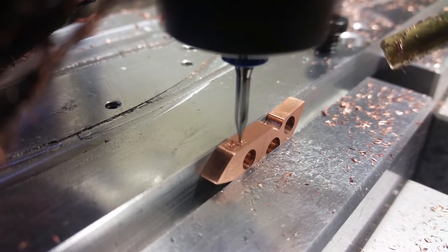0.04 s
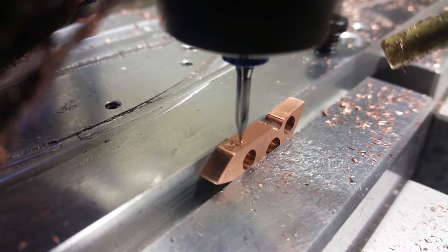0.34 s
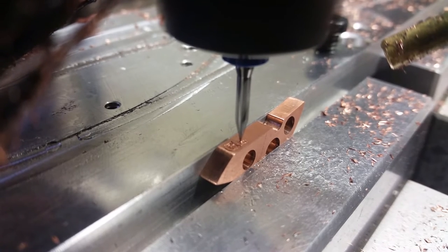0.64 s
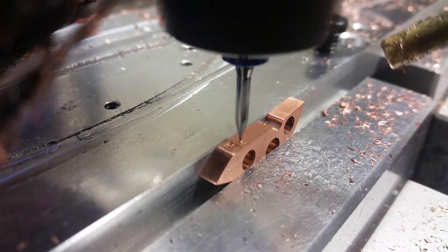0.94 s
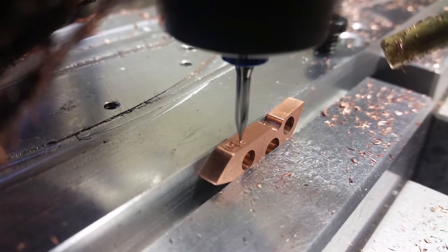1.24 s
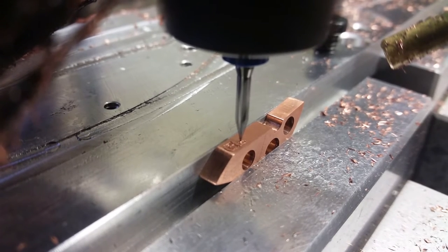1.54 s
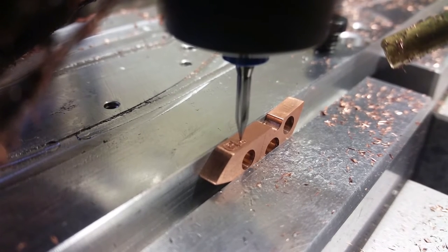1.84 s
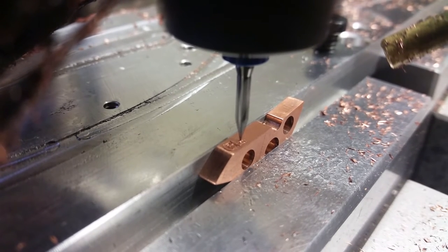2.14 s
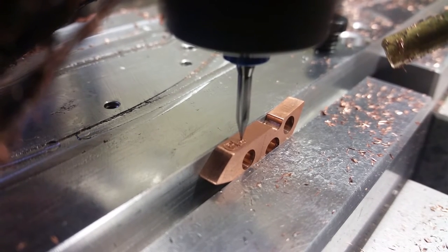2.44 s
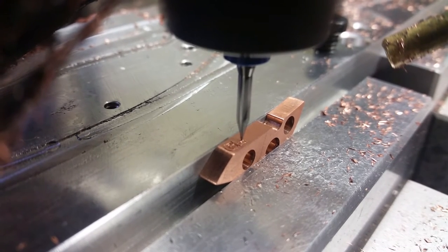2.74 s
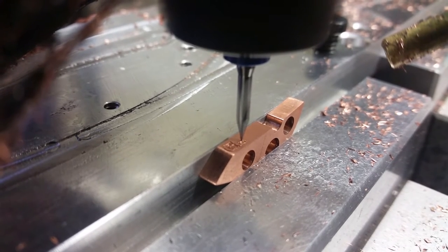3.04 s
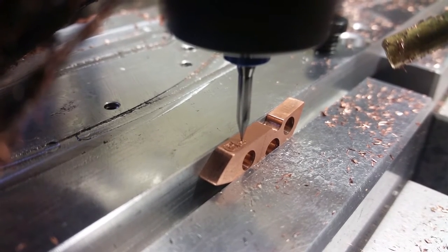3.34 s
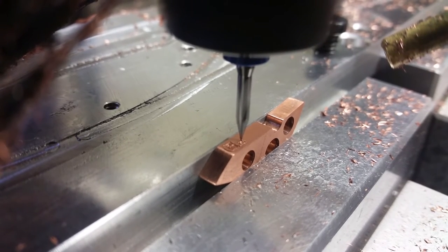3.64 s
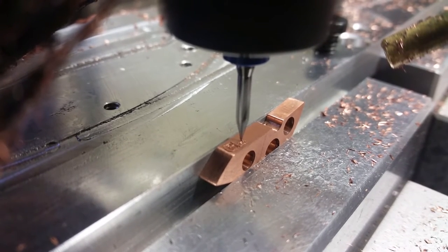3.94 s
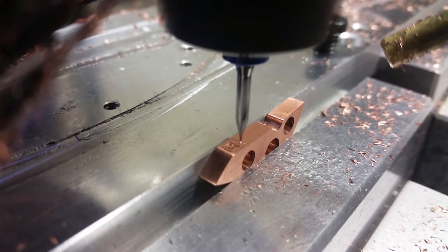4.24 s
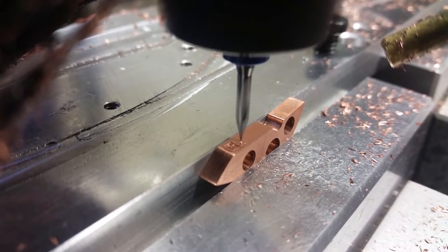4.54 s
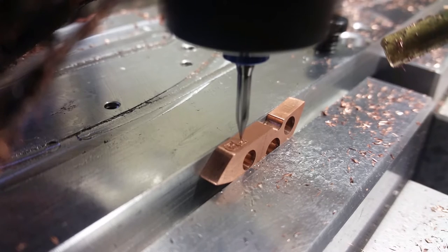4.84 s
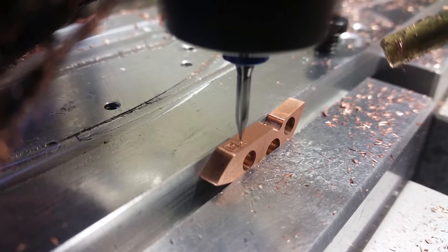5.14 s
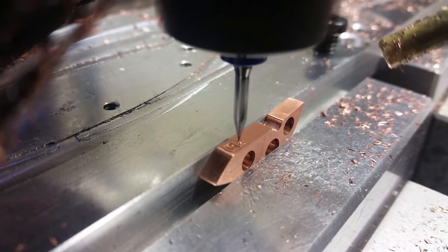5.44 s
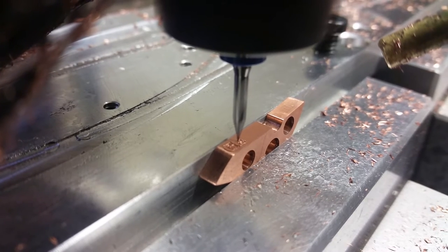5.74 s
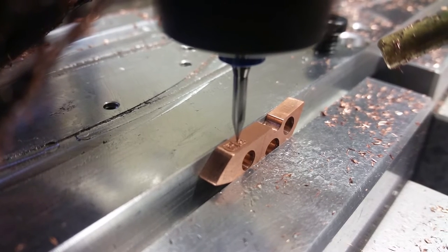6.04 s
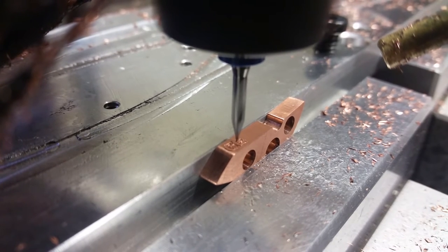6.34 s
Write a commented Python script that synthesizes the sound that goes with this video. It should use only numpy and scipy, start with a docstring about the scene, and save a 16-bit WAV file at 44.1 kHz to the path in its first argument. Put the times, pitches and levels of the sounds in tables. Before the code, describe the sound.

From the very start, a milling machine is running on a small copper part, heard close to the cutter. The spindle gives a steady low hum with a thin whine above it, a coolant pump drones underneath, and the enclosure rings faintly with the machine noise. Over this lies the bright, constant hiss of a nozzle, spread across both sides. All the way through, stray air washes over the left side of the microphone, making a fluttering rush with a steady tone and irregular pops, several a second, each trailing a short scuff. Around 5.7 seconds the air blows a little harder. Just after, at about 5.8 seconds, there is a stronger pop, the hum swells slightly under load and the whine dips briefly. The hum, hiss and puffs are still going at the end, at about 6.5 seconds.

```python
"""A CNC mill engraves a small copper part, heard from a phone close to the cutter.
From the start, spindle and coolant pump hum in a ringing enclosure, under a nozzle's bright hiss.
All the way through, stray air washes over the left microphone port, fluttering and popping in puffs.
Near 5.7 s the air blows a little harder; just after, the hum swells under load and the spindle's
thin whine dips briefly. The machine is still running at the end."""
import sys
import numpy as np
from scipy import signal
from scipy.fft import rfft, irfft
from scipy.io import wavfile

SR = 44100
rng = np.random.default_rng(int(sys.argv[2]) if len(sys.argv) > 2 else 0)


def generate_wav(sig):
    """Save sig (samples, or channels by samples) to the path in sys.argv[1] as 16-bit PCM at SR."""
    pcm = np.round(np.clip(np.atleast_2d(sig).T, -1, 1) * 32767).astype(np.int16)
    wavfile.write(sys.argv[1], SR, pcm)


N = 285768
T = np.arange(N) / SR
FREQS = np.arange(N // 2 + 1) * SR / N

# Strong puffs hitting the left port. Each row: start in seconds, relative level of the pop in dB,
# relative level of its wake in dB.
STRONG_PUFFS = [(0.058, -20.5, -31), (0.175, -20, -28), (0.369, -23, -29), (0.73, -18.5, -26),
                (0.869, -22, -32), (0.983, -16, -28), (1.02, -17.5, -27), (1.301, -21.5, -32),
                (1.477, -16.5, -28), (1.638, -17, -29), (1.937, -21.5, -31), (2.299, -25, -32),
                (2.509, -21, -29.5), (2.929, -22, -31), (2.98, -19.5, -30), (3.194, -25, -30),
                (3.769, -21, -30), (4.001, -22, -34), (4.549, -21.5, -32), (4.847, -18.5, -30),
                (5.02, -20, -28), (5.153, -24, -32), (5.329, -24, -31), (5.412, -21.5, -34),
                (5.781, -15, -27), (5.987, -22, -32), (6.005, -21, -30), (6.159, -23.5, -32),
                (6.429, -19, -31)]
PUFF_RISE_S = .0042  # from a puff's start to its peak
GUST_MIDDLE_S, GUST_HALF_S = 5.7, 0.71  # the stray air blows harder around here


def amp(db):
    """Decibels to gain."""
    return 10 ** (np.asarray(db) / 20)


def swell(middle_s, half_s):
    """A smooth rise to 1 and fall back to 0."""
    return np.exp(-((T - middle_s) / half_s) ** 2)


def drift(rate_hz):
    """Smooth random motion of unit spread, changing about rate_hz times a second."""
    motion = irfft(rfft(rng.standard_normal(N)) / (1 + (FREQS / rate_hz) ** 4), N)
    return motion / motion.std()


def colour(noise, points, lift_db=0):
    """Give unit white noise a spectrum of (Hz, dB per Hz) points."""
    hz, db = np.transpose(points)
    db = np.interp(np.log(FREQS + 1), np.log(hz), db) + lift_db
    return irfft(rfft(noise) * amp(db) * np.sqrt(SR / 2), N)


def delay(x, lag_s):
    """The same sound a little later."""
    return irfft(rfft(x) * np.exp(-2j * np.pi * FREQS * lag_s), N)


def cycle_angle(hz, wander):
    """Angle of something that turns or pulses at a nearly even rate."""
    return 2 * np.pi * np.cumsum(hz * (1 + wander * drift(3.6))) / SR


def partials(angle, rows, waver_db, left_lead_rad=0.47):
    """Stereo tones from (multiple of the angle, left dB, right dB) rows; each wavers on its own."""
    tones = np.zeros((2, N))
    for multiple, left_db, right_db in rows:
        phase = multiple * angle + rng.uniform(0, 2 * np.pi)
        pair = np.array([amp(left_db) * np.sin(phase), amp(right_db) * np.sin(phase - left_lead_rad)])
        tones += np.sqrt(2) * pair * amp(waver_db * drift(2.8))
    return tones


def enclosure():
    """A bed of machine noise ringing in the panels; its bass is alike at both ports."""
    # Tone of the enclosure and workshop. Each row: frequency in Hz, level in dB per Hz.
    room_tone = [(25, -83), (55, -83), (90, -77), (200, -74), (280, -68), (430, -83), (500, -80.5),
                 (700, -79.5), (1500, -78.5), (2100, -75.5), (3600, -76.5), (5000, -82), (15000, -93)]
    # Panel resonances. Each row: centre in Hz, width in Hz, lift in dB.
    panels = [(574, 45, 15), (1170, 70, -1), (1263, 28, 10.5), (1890, 70, 4.5), (2600, 110, 3.5)]
    ring_db = sum(db / (1 + (2 * (FREQS - hz) / width) ** 2) for hz, width, db in panels)
    common, own = rng.standard_normal(N), rng.standard_normal((2, N))
    alike = 1 / (1 + (FREQS / 700) ** 2)
    noise = irfft(rfft(common) * np.sqrt(alike) + rfft(own) * np.sqrt(1 - alike), N)
    return colour(noise, room_tone, ring_db)


def coolant_pump(shaft_hz=28.5):
    """The pump's slow motor drones underneath."""
    # The drone's partials. Each row: multiple of the shaft rate, left level in dB, right level in dB.
    drone = [(2, -55, -51), (3, -70, -58), (4, -79, -73), (5, -63, -66), (6, -70, -69), (9, -65, -59),
             (10, -50.5, -52), (11, -66, -66), (14, -59, -68)]
    return partials(cycle_angle(shaft_hz, wander=0.00063), drone, waver_db=1.2, left_lead_rad=.2)


def spindle(turn_hz=118.3, whine_db=-42.5, lull_depth_db=7):
    """The spindle's hum and thin whine, both locked to its turning rate."""
    # The hum riding the load. Each row: time in seconds, hum level in dB.
    load = [(0.1, -34.5), (0.29, -33.5), (5.19, -35), (5.78, -31.5), (6.02, -34), (6.22, -33),
            (6.45, -33.5)]
    # The hum's partials. Each row: multiple of the turning rate, left and right dB against the hum level.
    harmonics = [(1, -0.5, 1), (2, -17.5, -16), (3, -14.5, -14.5), (4, -35, -28), (5, -36, -30),
                 (6, -24, -31), (7, -28, -31), (8, -33, -23), (9, -22, -28), (11, -44, -20.5),
                 (12, -38, -43), (16, -29, -19)]
    angle = cycle_angle(turn_hz, wander=0.00042)
    hum = partials(angle, harmonics, waver_db=0.34) * amp(np.interp(T, *np.transpose(load)))
    whine = partials(angle, [(10, 0, -13.0)], waver_db=1.0, left_lead_rad=1.25)
    lull_db = lull_depth_db * swell(middle_s=5.8, half_s=.3)
    return hum + whine * amp(whine_db - lull_db)


def overload(hiss, knee_db):
    """A port saturates softly: the crests flatten, the mean level holds."""
    crest = np.abs(signal.hilbert(hiss)) / (hiss.std() * amp(knee_db))
    flattened = hiss / np.sqrt(1 + crest ** 2)
    return flattened * hiss.std() / flattened.std()


def nozzle(direct_share=0.31, lag_s=0.000323, surge_db=0.23, flicker_db=0.38):
    """Jet hiss: straight into the left port, later and mostly scattered off metal into the right."""
    # Hiss colour at each port. Each row: frequency in Hz, level in dB per Hz.
    left_colour = [(2000, -80), (4400, -67.5), (4750, -60.5), (5200, -64.5), (6400, -64.5), (7700, -55.5),
                   (8200, -48.5), (9700, -48.5), (10100, -53), (11000, -56), (11800, -61.5), (13800, -59.5),
                   (15000, -59), (15700, -60.5)]
    right_colour = [(2000, -90), (7400, -78), (8500, -80), (9900, -71.5), (10400, -72.5), (11400, -56),
                    (11900, -53.6), (12500, -47.3), (13200, -49.6), (13500, -55), (13900, -55.2),
                    (14300, -60.5), (15200, -57.3), (15700, -59.4)]
    jet, scattered = rng.standard_normal((2, N))
    right = direct_share * delay(jet, lag_s) + np.sqrt(1 - direct_share ** 2) * scattered
    right = colour(right * amp(flicker_db * drift(40)), right_colour)
    left = overload(colour(jet, left_colour), knee_db=4.0)
    return amp(surge_db * drift(13)) * np.array([left, right])


def add_eddy(pressure, start_s, size, swing_s, push_s=.00066, suction_s=0.00078):
    """One eddy pops across the port: a sharp push, then two weaker waves of suction."""
    span = slice(int(start_s * SR), int((start_s + .03) * SR))
    t = T[span] - start_s - PUFF_RISE_S
    push = np.exp(-(t / push_s) ** 2)
    first, second = (np.exp(-((t - k * swing_s) / suction_s) ** 2) for k in (1, 2))
    pressure[span] += size * (push - 0.5 * first - 0.39 * second)


def puffs(strong_gain_db=6.5, typical_swing_s=0.00248, weak_count=260, gust_lift_db=2.5):
    """Strong pops stand out of a random patter of weak ones that grows with the gust."""
    patter, strong = np.zeros((2, N))
    for when, size, pace in rng.random((weak_count, 3)):
        weak_db = -27 + 5.5 * (2 * size - 1.5)
        add_eddy(patter, when * T[-1], amp(weak_db), typical_swing_s * (.5 + pace))
    for start_s, pop_db, _ in STRONG_PUFFS:
        swing_s = typical_swing_s * np.exp(0.17 * rng.standard_normal())
        add_eddy(strong, start_s, amp(pop_db + strong_gain_db), swing_s)
    return strong + patter * amp(gust_lift_db * swell(GUST_MIDDLE_S, GUST_HALF_S))


def wakes(gain_db=4.5, decay_s=.016):
    """Each strong puff trails a short scuff of turbulence."""
    # Colour of the scuff. Each row: frequency in Hz, relative level in dB per Hz.
    scuff_colour = [(80, -25), (300, -28.5), (700, -30.5), (1300, -32.5), (2500, -39), (6000, -42)]
    kicks = np.zeros(N)
    for start_s, _, wake_db in STRONG_PUFFS:
        kicks[int((start_s + PUFF_RISE_S) * SR)] = amp(wake_db + gain_db)
    tails = signal.lfilter([1], [1, -np.exp(-1 / (decay_s * SR))], kicks)
    return colour(tails * rng.standard_normal(N), scuff_colour)


def air_stream(flutter_hz=347.9, flutter_depth=0.32, trim_db=-1.2, gust_lift_db=0.6):
    """Stray air sings a pulsing tone; on the left port alone, a rush flutters with it and puffs land."""
    # The pulsing tone. Each row: multiple of the flutter rate, left level in dB, right level in dB.
    flutter_tone = [(.5, -68, -64), (1, -35, -48.5), (2, -54, -55.5)]
    # Colour of the rush. Each row: frequency in Hz, relative level in dB per Hz.
    rush_colour = [(20, -75), (50, -69), (100, -61), (200, -64), (450, -64), (1000, -63), (1800, -64.5),
                   (4000, -62.5), (7000, -65), (15000, -68)]
    angle = cycle_angle(flutter_hz, wander=0.00035)
    flow_db = trim_db + gust_lift_db * swell(GUST_MIDDLE_S, GUST_HALF_S)
    eddies_db = 1.95 * drift(240)
    surge_db = 0.7 * drift(13)
    strength = amp(flow_db + eddies_db + surge_db) * (1 + flutter_depth * np.sin(angle))
    rush = colour(rng.standard_normal(N) * strength, rush_colour)
    left = rush + puffs() + wakes()
    return partials(angle, flutter_tone, waver_db=1.5) + np.array([left, np.zeros(N)])


def scene():
    """All layers run together from start to end."""
    return spindle() + coolant_pump() + nozzle() + air_stream() + enclosure()


def record(dry, low_cut_hz=25, top_hz=15750):
    """The phone drops the deepest rumble and cuts the top steeply."""
    low_cut = signal.butter(1, low_cut_hz, "high", fs=SR, output="sos")
    high_cut = signal.ellip(12, .1, 80, top_hz, fs=SR, output="sos")
    return signal.sosfilt(high_cut, signal.sosfilt(low_cut, dry))


dry = scene()
out = record(dry)
generate_wav(out)
```